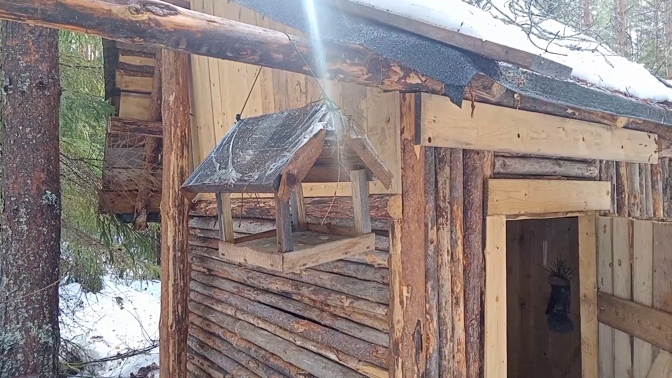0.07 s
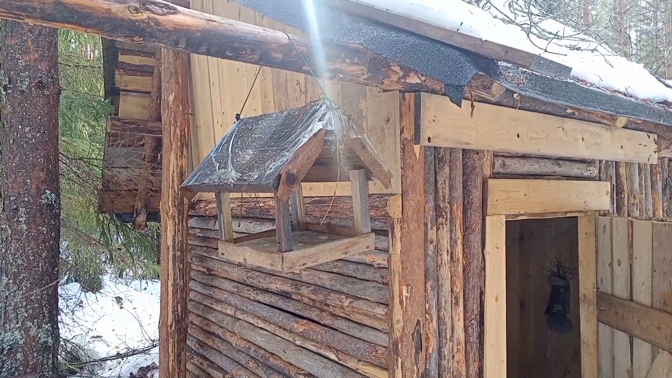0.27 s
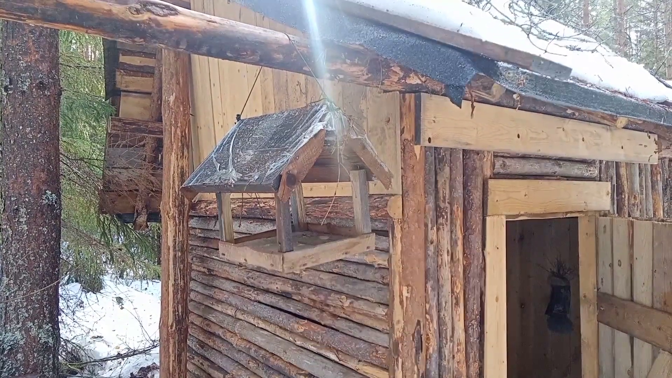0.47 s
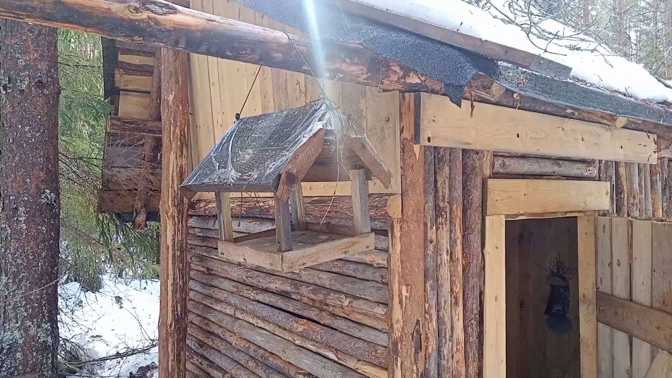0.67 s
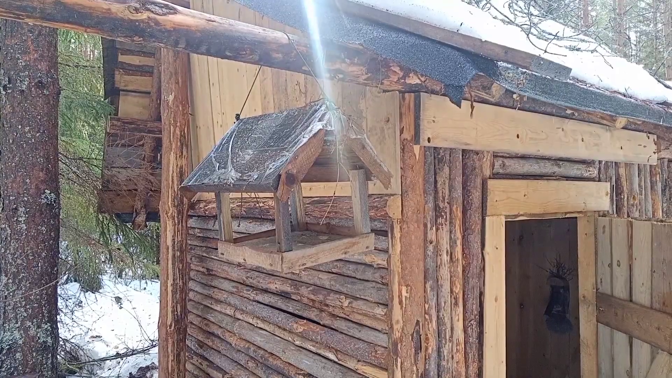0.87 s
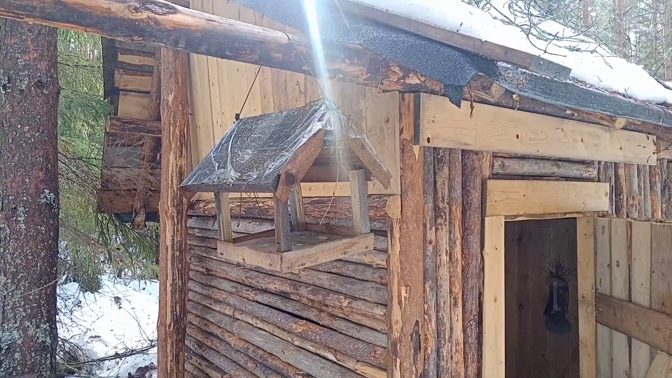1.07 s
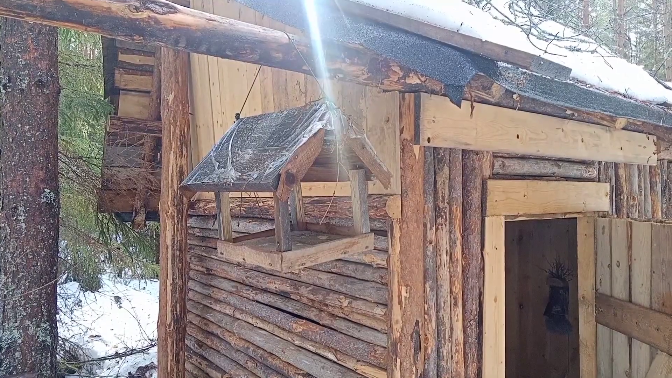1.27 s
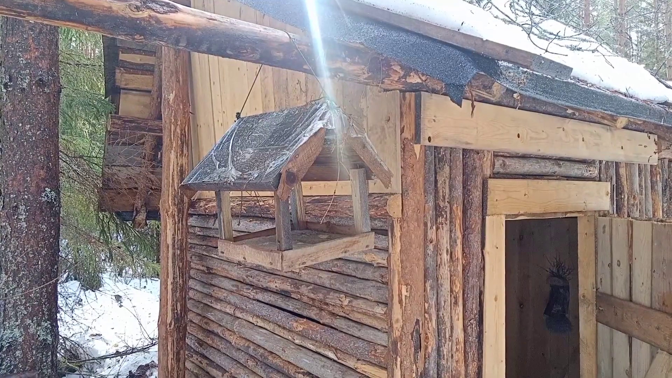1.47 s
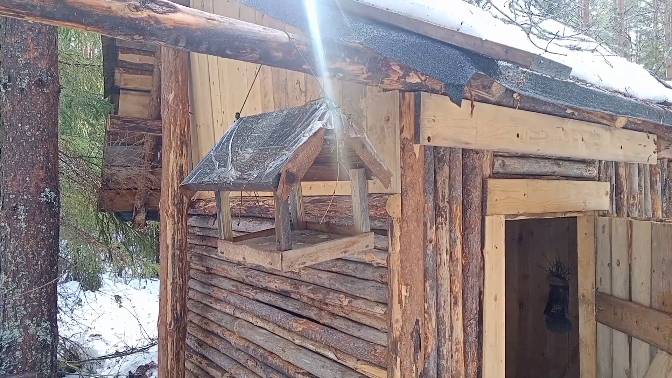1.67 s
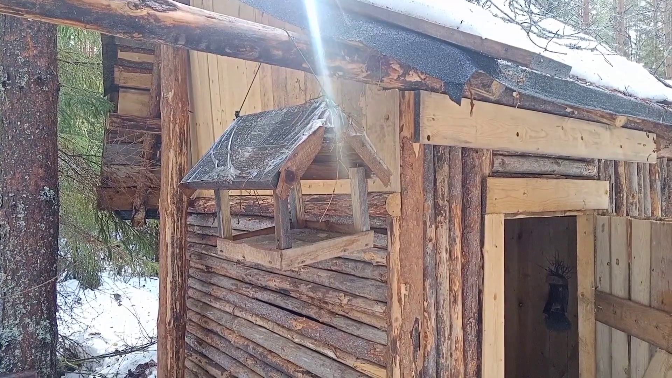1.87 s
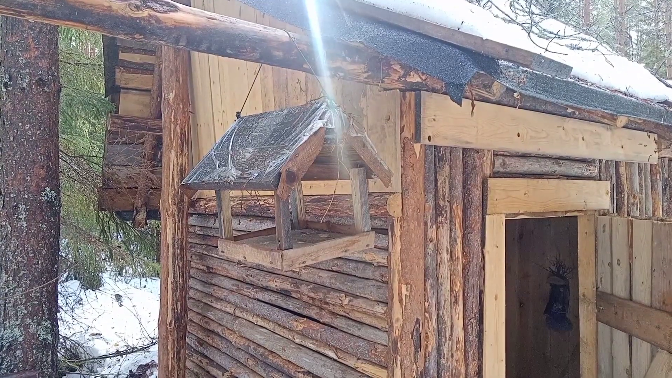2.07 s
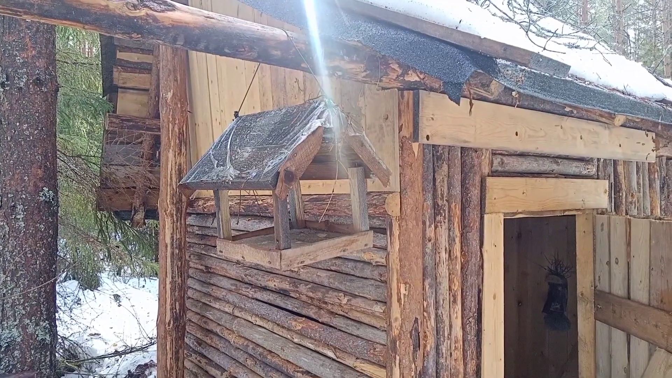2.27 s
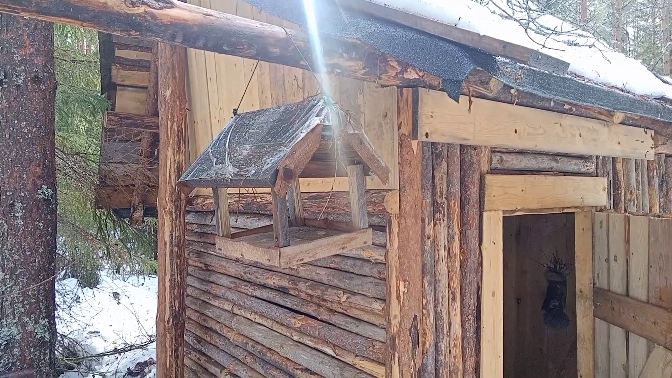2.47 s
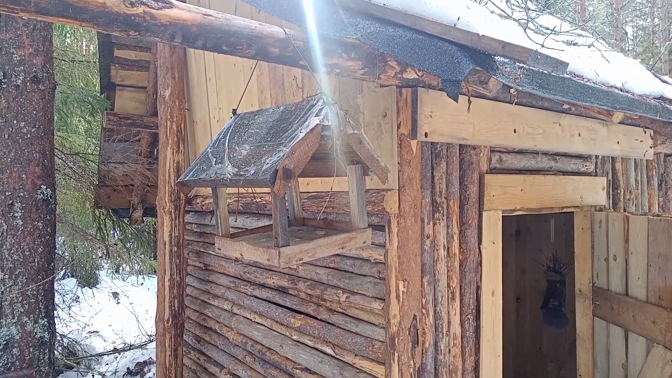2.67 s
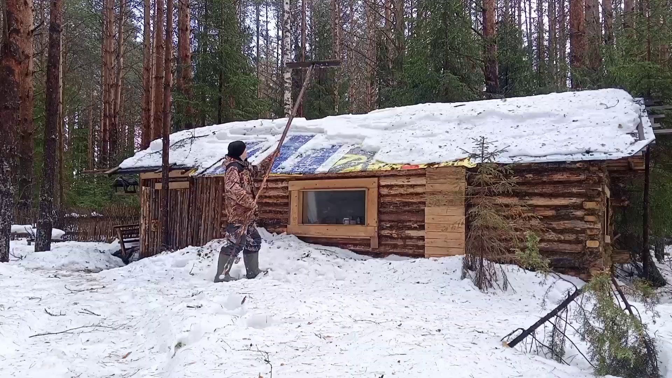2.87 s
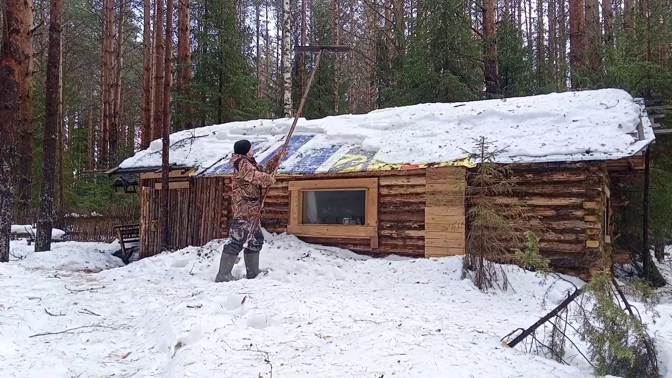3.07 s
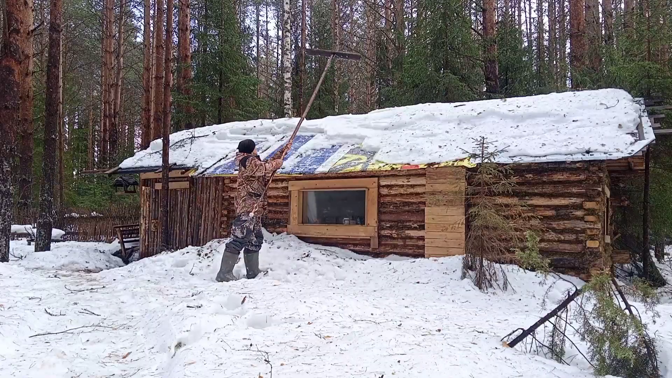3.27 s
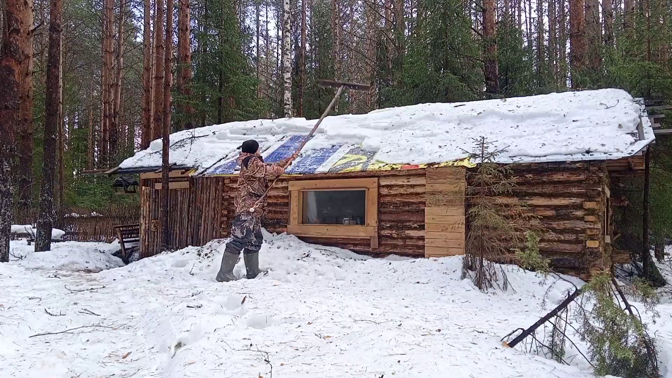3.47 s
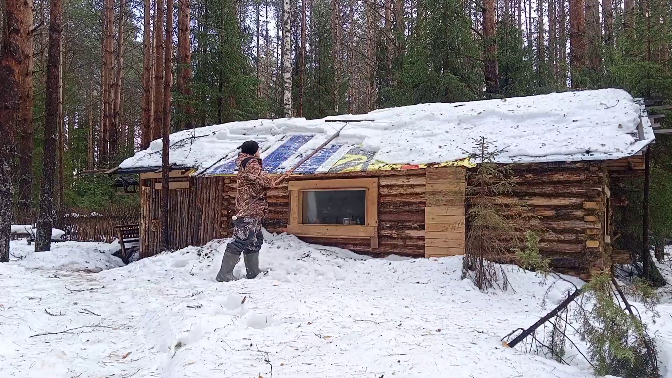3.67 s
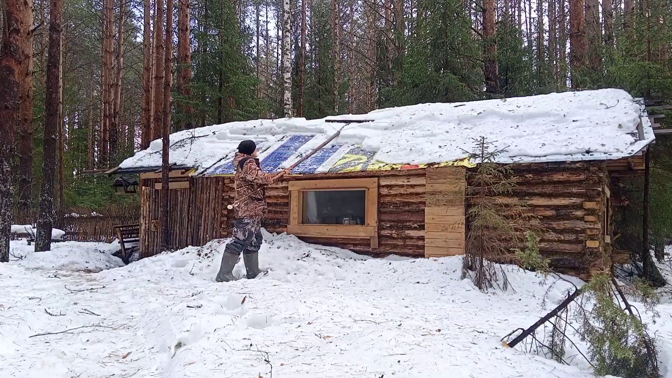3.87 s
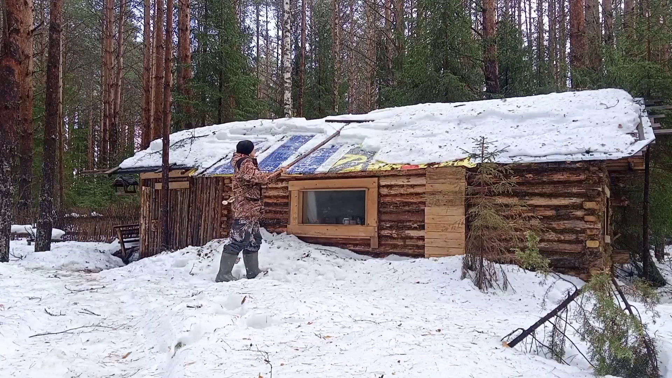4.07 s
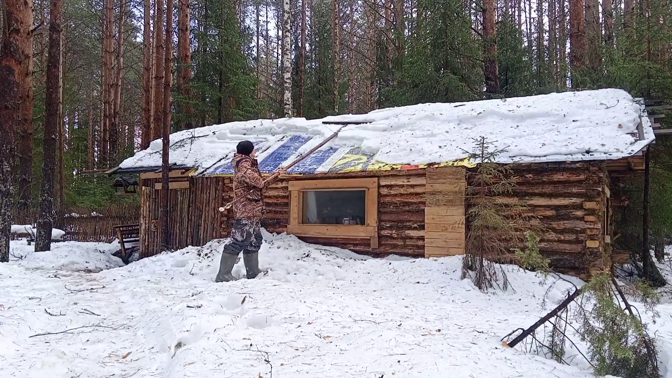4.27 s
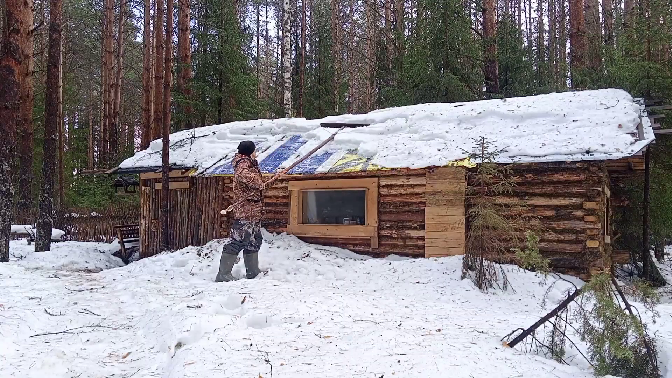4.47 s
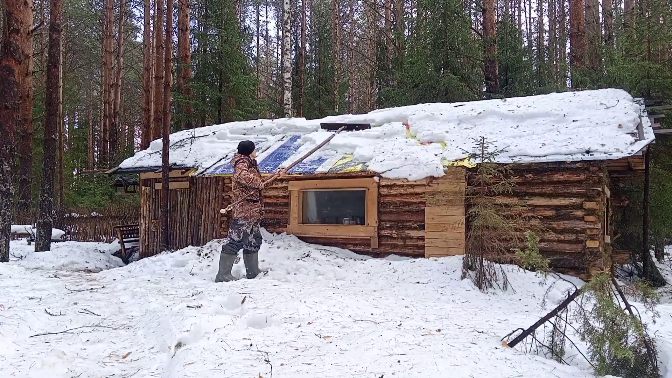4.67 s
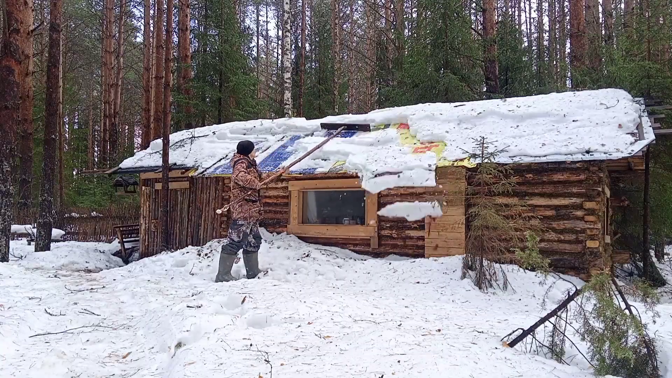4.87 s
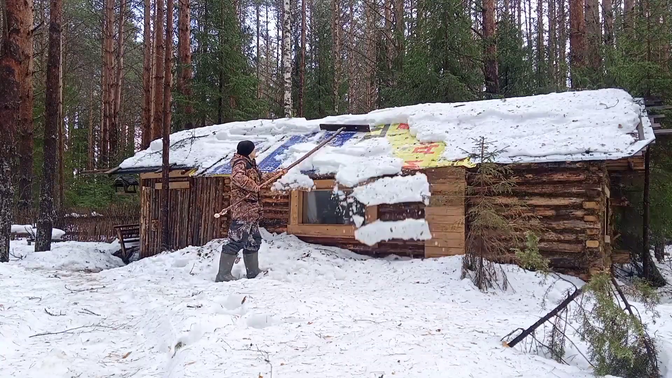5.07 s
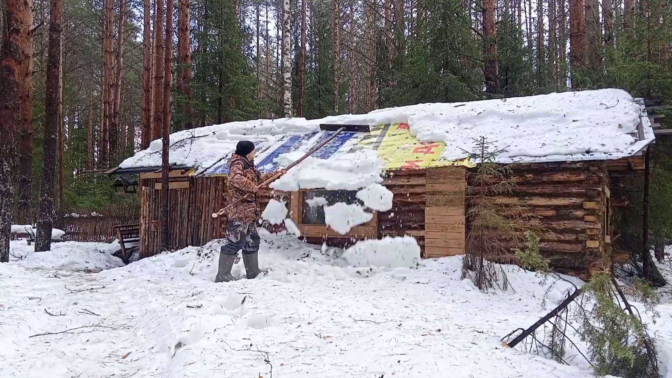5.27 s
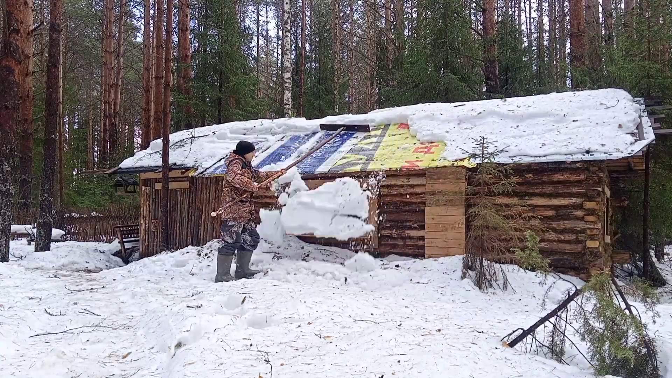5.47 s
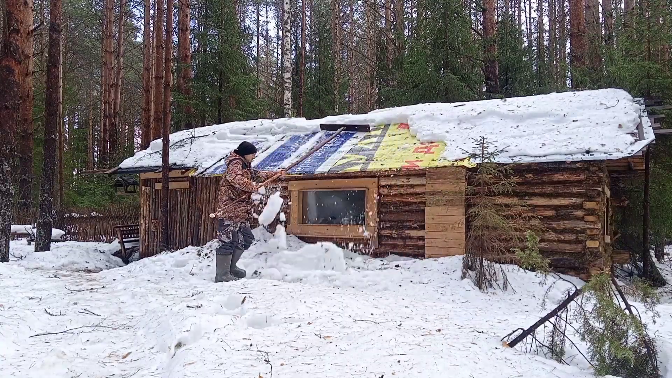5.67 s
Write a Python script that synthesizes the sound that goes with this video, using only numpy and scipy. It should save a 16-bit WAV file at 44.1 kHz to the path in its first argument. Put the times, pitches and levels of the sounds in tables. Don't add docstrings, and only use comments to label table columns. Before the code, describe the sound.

A still thawing forest by a log cabin: faint air, sparse watery plinks and tiny ticks on wood. After a very brief silence the scene moves to the yard, where a little loose snow slips. A roof rake crunches sharply into crust, bounces, then drags slabs down a tarp in a growing hiss, ending in soft heavy landings. Small microphone some metres away, dry outdoor sound.

```python
import sys
import numpy as np
from scipy import signal
from scipy.io import wavfile
from scipy.ndimage import uniform_filter1d

SR = 44100
rng = np.random.default_rng(int(sys.argv[2]) if len(sys.argv) > 2 else 0)


def to_linear_factor(level_db):
    exponent = np.asarray(level_db, float) / 20
    return 10 ** exponent


def master_out(mix):
    frames = np.transpose(np.atleast_2d(mix))
    ceiling = np.clip(frames, -1, 1)
    pcm = np.round(ceiling * 32767).astype(np.int16)
    wavfile.write(sys.argv[1], SR, pcm)


N = 252252
HZ = np.fft.rfftfreq(4096, 1 / SR)


def evened(x):
    return x / np.sqrt(np.mean(x ** 2) + 1e-20)


def read(points, hz):
    f, value = np.transpose(points)
    return np.interp(np.log(hz + 1), np.log(f + 1), value)


def add(mix, s, sound):
    part = mix[round(s * SR):][:len(sound)]
    part += sound[:len(part)]


def colour(x, gain_db):
    log_gain = np.log(to_linear_factor(np.maximum(gain_db, -100)))
    circle = np.r_[log_gain, log_gain[-2:0:-1]]
    taps = np.fft.ifft(np.exp(circle - 1j * signal.hilbert(circle).imag)).real
    return signal.oaconvolve(x, taps)[:len(x)]


def band_db(lo_hz, hi_hz):
    low_edge = 1 + (lo_hz / (HZ + 1)) ** 6
    high_edge = 1 + (HZ / hi_hz) ** 6
    return -10 * np.log10(low_edge * high_edge)


def patchy(x, patch_db):
    z = signal.stft(x, nperseg=512, noverlap=384)[2]
    patches = rng.standard_normal(z.T.shape)
    patches = uniform_filter1d(patches, size=12, axis=0)
    patches = evened(uniform_filter1d(patches, size=5, axis=1))
    return signal.istft(z * to_linear_factor(patch_db * patches.T), nperseg=512, noverlap=384)[1][:N]


def grains(per_s, spread_db):
    hit = rng.random(N) < per_s / SR
    size = rng.exponential(1, N)
    sign = rng.choice([-1., 1.], N)
    return evened(hit * sign * to_linear_factor(spread_db * np.minimum(size, 4)))


def level(rows, column, lag_s=0.):
    rows = np.asarray(rows)
    t = np.arange(N) / SR - lag_s
    return to_linear_factor(np.interp(t, rows[:, 0], rows[:, column], left=-150, right=-150))


def swell(s, db, rise, fall):
    t = np.arange(N) / SR - s
    return to_linear_factor(db - np.where(t < 0, -rise * t, fall * t))


def ring(db, hz, t60, rise, glide=0.):
    t = np.arange(round(.25 * SR)) / SR
    attack = np.sin(np.pi / 2 * np.clip(t / max(rise, 1e-4), 0, 1)) ** 2
    decay = to_linear_factor(-60 * np.maximum(t - rise, 0) / t60)
    return to_linear_factor(db) * attack * decay * np.sin(2 * np.pi * hz * (t + glide * t ** 2))


CUT = (2.693, 2.7545)
# frequency in Hz, density in dB per Hz.
AIR = [(18, -53.5), (30, -16.5), (60, -9.5), (123, -4), (330, -4), (714, -6), (900, -9.5), (1900, -12.5),
       (3300, -19.5), (4300, -27), (5500, -36), (8000, -39.5), (11000, -44.5), (15500, -41)]


def air():
    forest_db, yard_db = -66, -64.5
    hush = evened(patchy(colour(rng.standard_normal(N), read(AIR, HZ)), patch_db=2.0))
    return hush * to_linear_factor(np.where(np.arange(N) < CUT[1] * SR, forest_db, yard_db))


# start in seconds, peak in dB, pitch in Hz, t60 in seconds.
DRIPS = [(.059, -59, 1450, 0.027), (0.3836, -36.5, 819, 0.058), (.384, -55, 2050, 0.0062),
         (.384, -48, 635, .025), (.736, -53.5, 1500, 0.027), (.777, -60, 2380, .02), (.849, -61, 2100, .02),
         (0.856, -57, 1550, .03), (1.151, -61, 1220, .03), (1.335, -57.5, 1650, 0.023),
         (1.5299, -52, 486, 0.022), (1.904, -58, 1550, .03), (1.94, -55.5, 2270, 0.024),
         (2.255, -53, 1470, 0.014), (2.255, -66, 1160, 0.022), (2.526, -49.5, 1370, 0.0066),
         (2.528, -55, 93, 0.047)]


def drips():
    out = np.zeros(N)
    for s, db, hz, t60 in DRIPS:
        add(out, s, ring(db, hz, t60, rise=0.00071, glide=2.4))
    return out


# start in seconds, fizz in dB, then body and finest spray
# in dB over the fizz.
TICKS = [(0.128, -53, 4, -12), (.3254, -84, 0, 4), (0.348, -66.5, 11, -10), (.383, -72, 12, -12),
         (.415, -63, -9, -22), (.4883, -72, -6, -10), (0.553, -74, 15, -14), (.683, -66, -5, -8),
         (.7494, -84, -6, 4), (.7614, -77, -6, -6), (.7844, -67, -6, -8), (.828, -67, -1, -13),
         (.8534, -84, -6, 6), (.9148, -75, 4, -18), (1.1483, -69, 11, -18), (1.288, -79, -6, -16),
         (1.3344, -75, 12, -13), (1.4436, -73, -3, -16), (1.5172, -50, -18, -12), (1.529, -56.5, 4, -21),
         (1.6097, -71, -3, -17), (1.9011, -72, -4, -24), (2.142, -65, -8, -10), (2.525, -54.5, 10, -12),
         (2.6005, -60.5, -4, -19)]
# start in seconds, fizz in dB, t60 in seconds.
TRICKLES = [
    (2.16, -82, .25),
    (2.35, -82, .15),
    (2.40, -80, .1),
    (2.47, -84, .1),
]
# start in seconds, fizz in dB.
CRUMBS = [
    (3.965, -54),
    (4.015, -59.5),
    (4.079, -62),
    (4.101, -58.5),
    (4.143, -59),
]


def splats():
    rows = []
    for s, db, body_db, fine_db in TICKS:
        over_soft_db = max(db + 75, 0)
        rows.append((s, db, body_db, fine_db, 0.039 * to_linear_factor(-0.1 * over_soft_db)))
    rows += [(s, db, -6, -4, t60) for s, db, t60 in TRICKLES]
    rows += [(s, db, 16, -12, 0.033) for s, db in CRUMBS]
    return rows


def ticks():
    layers = np.zeros((3, N))
    t = np.arange(4000) / SR
    for s, db, body_db, fine_db, t60 in splats():
        decay = to_linear_factor(-60 * t / t60) * np.minimum(t / .001, 1)
        splat = rng.standard_normal(len(t)) * decay
        for layer, layer_db in zip(layers, (db + body_db, db, db + fine_db)):
            add(layer, s, splat * to_linear_factor(layer_db))
    bands_hz = [(1500, 5530), (6500, 8300), (13600, 19000)]
    body, fizz, fine = (colour(x, 4 * band_db(*edges)) for x, edges in zip(layers, bands_hz))
    return body + to_linear_factor(11) * fizz + to_linear_factor(18) * fine


def trunks(x):
    t = np.arange(round(.4 * SR)) / SR
    sign = rng.choice([-1., 1.], len(t))
    sparse = (rng.random(len(t)) < .05) * (t > .006)
    taps = colour(sign * sparse * to_linear_factor(-60 * t / 0.27), band_db(89, 4500))
    return signal.fftconvolve(x, taps / np.linalg.norm(taps))[:N]


# start in seconds, sliding in dB, powder in dB over it,
# fall in dB per second, length in seconds.
SLIPS = [
    (2.7693, -59, -4.5, 48, 0.14),
    (2.944, -66, -7, 60, 0.025),
    (2.99, -70, -15, 58, .035),
    (3.788, -54.5, -12, 148, 0.05),
    (3.87, -61, -16, 40, 0.041),
    (3.92, -64.5, 1, 119, .03),
    (3.959, -62.5, -1.5, 90, 0.069),
    (3.78, -72.5, 2, 1, .45),
    (4.22, -64, 4, 16, .1),
]
SIFT = (2.9, -76, -10, 5, .6)


def slip(s, db, powder_db, fall, length):
    past_catch_s = np.maximum(np.arange(N) / SR - s - length, 0)
    run = swell(s, db, 3000, fall) * to_linear_factor(-250 * past_catch_s)
    parts_db = np.array([-13.5, 6.5, 0, powder_db])
    return np.outer(to_linear_factor(parts_db), run) ** 2


# time in seconds, boom in dB.
NUDGES = [
    (3.525, -52),
    (3.59, -57),
    (3.70, -46),
    (5.639, -47),
]
# time in seconds, sliding in dB, coarseness in dB.
HAUL = [
    (4.03, -64.5, -0.5),
    (4.173, -60.5, -3),
    (4.233, -56, 9.5),
    (4.273, -47.5, 4.5),
    (4.483, -38.5, 0.5),
    (4.76, -34, -2.5),
    (4.87, -33, -3),
    (5.083, -35.5, -5),
    (5.36, -42, -4.5),
    (5.72, -49, -17),
]
# time in seconds, level in dB.
LANDINGS = [
    (5.133, -44.5),
    (5.273, -37),
    (5.422, -37.5),
    (5.515, -37),
    (5.59, -39.5),
    (5.673, -44),
    (5.715, -35.5),
]
LAND_PARTS_DB = (-17, -8, 0.5, -0.5)


def motion():
    slide = level(HAUL, column=1)
    boom = to_linear_factor(-55) * (slide / slide.max()) ** 0.48
    lumps = slide * level(HAUL, column=2)
    powder = to_linear_factor(-10) * level(HAUL, column=1, lag_s=0.039)
    power = np.array([boom, lumps, slide, powder]) ** 2
    power[0] += to_linear_factor(2 * -62) * (np.arange(N) > CUT[1] * SR)
    power[0] += sum(swell(s, db, 900, 900) ** 2 for s, db in NUDGES)
    power += sum(slip(*row) for row in SLIPS + [SIFT])
    landing = sum(swell(s, db, 253, 184) ** 2 for s, db in LANDINGS)
    return np.sqrt(power + np.outer(to_linear_factor(np.array(LAND_PARTS_DB)) ** 2, landing))


# frequency in Hz, density in dB per Hz.
SNOW = [(30, -61), (60, -5.5), (140, -0.5), (270, -7.5), (800, -7.5), (1500, -6), (2100, -0.5), (2900, 2),
        (4100, -5), (5700, -11.5), (7900, -8), (9500, -16.5), (11500, -21.5), (15500, -14)]
# frequency in Hz, density in dB per Hz.
LANDING = [(30, -50), (55, 7), (95, 1.5), (170, -7), (420, -14), (1300, -9.5), (3250, -3.5), (4300, -9),
           (5400, -13.5), (7900, -6.5), (9500, -17), (12200, -18.5), (15500, -8.5)]
FALL_S = (4.76, 5.42)
# low edge in Hz, high edge in Hz, grains per second,
# grain size spread in dB, patchiness in dB.
PARTS = [
    (45, 200, 400, 2, 1.5),
    (200, 1250, 2000, 3.5, 1.6),
    (1250, 5200, 7000, 3.5, 1.1),
    (5200, 15600, 14000, 3, .7),
]


def rushes():
    out = np.zeros(N)
    landed = np.interp(np.arange(N) / SR, FALL_S, [0, 1])
    judder = to_linear_factor(0.84 * evened(uniform_filter1d(rng.standard_normal(N), size=250)))
    for gain, (lo_hz, hi_hz, per_s, spread_db, patch_db) in zip(motion(), PARTS):
        crumbs = (grains(per_s, spread_db) + 1.22 * rng.standard_normal(N)) * judder
        band = band_db(lo_hz, hi_hz)
        drag = evened(colour(crumbs, read(SNOW, HZ) + band))
        burst = evened(colour(crumbs, read(LANDING, HZ) + band))
        out += gain * evened(patchy((1 - landed) * drag + landed * burst, patch_db))
    return out


# frequency in Hz, density in dB per Hz.
CRUST = [(29, -57), (50, -4), (171, -6.5), (343, 1), (705, -7), (1500, -9), (2300, -6), (3600, -10.5),
         (5860, -26), (7600, -21), (10400, -33), (15500, -30)]
# time in seconds, crush in dB.
CRUSH = [
    (3.696, -83),
    (3.709, -40),
    (3.712, -36),
    (3.717, -26),
    (3.745, -29.5),
    (3.762, -40),
    (3.772, -47.5),
    (3.83, -53.5),
    (3.9, -66),
]
# start in seconds, peak in dB, pitch in Hz.
CRACKS = [
    (3.7155, -14.5, 3670),
    (3.7166, -26.5, 5060),
    (3.718, -11.5, 2440),
    (3.7222, -17, 2000),
    (3.7283, -17, 1210),
    (3.7357, -21, 2190),
    (3.751, -18, 1220),
    (3.8895, -30.5, 2110),
    (4.4626, -17, 1250),
    (5.2665, -21, 3340),
]
# start in seconds, peak in dB, pitch in Hz,
# t60 in seconds, rise in seconds.
THUDS = [(3.711, -34, 366, 0.18, 0.0064), (3.724, -33.5, 475, 0.15, 0.0039), (3.738, -54, 168, 0.094, .01),
         (3.884, -24.5, 160, 0.035, 0.0095), (3.8935, -28, 324, 0.014, 0.00082),
         (3.889, -39, 740, 0.029, 0.0026), (4.03, -47.5, 184, 0.066, .005),
         (4.409, -31, 255, 0.054, 0.0023), (4.4631, -27.5, 288, 0.034, 0.0017),
         (4.67, -29.5, 267, 0.06, 0.0026), (4.895, -24.5, 288, 0.032, 0.0027),
         (5.124, -38.5, 87.5, 0.11, 0.0073), (5.489, -47.5, 90, 0.12, 0.0078),
         (5.578, -41, 98, 0.059, 0.0076), (5.621, -46, 108, 0.049, 0.0038),
         (5.702, -31.5, 167, 0.035, 0.0034)]


def rake():
    crumble = grains(per_s=7000, spread_db=2.2) + 1.07 * rng.standard_normal(N)
    bounce = swell(3.887, -47, rise=1900, fall=230)
    out = evened(colour(crumble, read(CRUST, HZ))) * (level(CRUSH, column=1) + bounce)
    for s, db, hz in CRACKS:
        add(out, s, ring(db, hz, t60=0.0016, rise=0.00041))
    for s, *blow in THUDS:
        add(out, s, ring(*blow))
    return out


def scene():
    near = drips() + ticks()
    blows = rake()
    echoes = trunks(to_linear_factor(-27) * near + to_linear_factor(-21) * blows)
    mono = air() + near + blows + echoes + rushes()
    return np.array([mono, mono])


def roll_off(x):
    return signal.sosfilt(signal.butter(12, 16010, fs=SR, output="sos"), x)


def record(dry):
    t = np.arange(N) / SR
    heard = signal.sosfilt(signal.butter(2, 40, "high", fs=SR, output="sos"), dry)
    band_limit = signal.firwin(1601, 15540, window=("kaiser", 9), fs=SR)
    heard = signal.oaconvolve(heard, band_limit[None], "same")
    playing = 1. * ((t < CUT[0]) | (t > CUT[1]))
    mix = heard * uniform_filter1d(playing, size=60)
    return roll_off(mix)


dry = scene()
out = record(dry)
master_out(out)
```